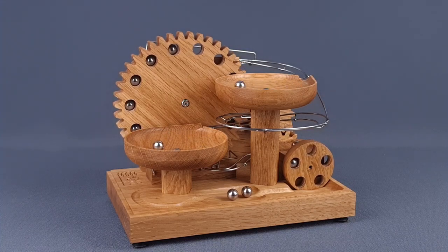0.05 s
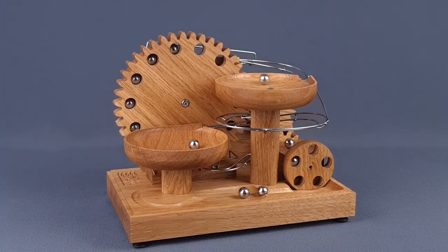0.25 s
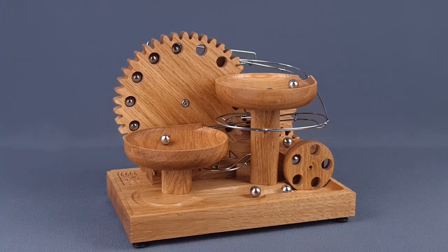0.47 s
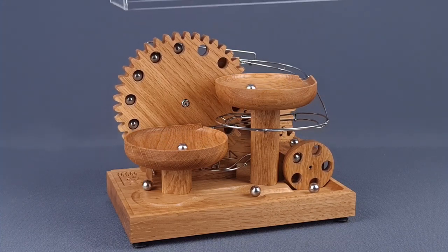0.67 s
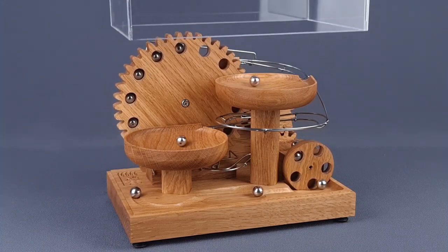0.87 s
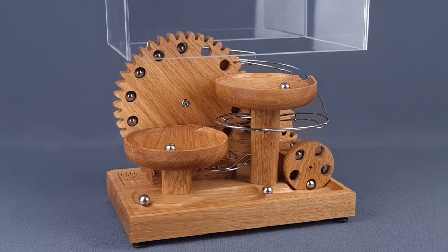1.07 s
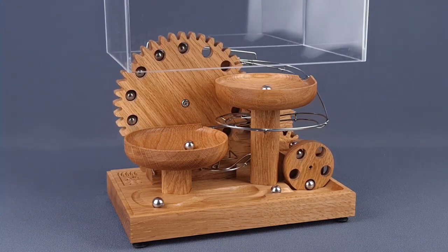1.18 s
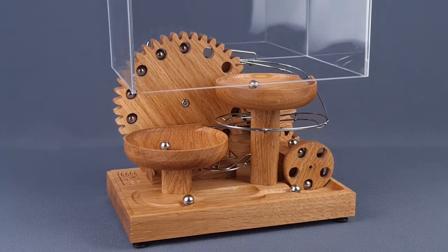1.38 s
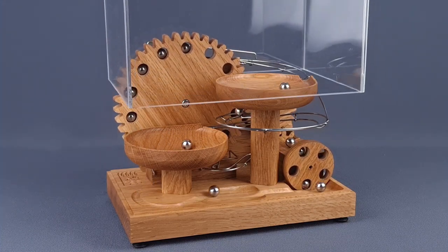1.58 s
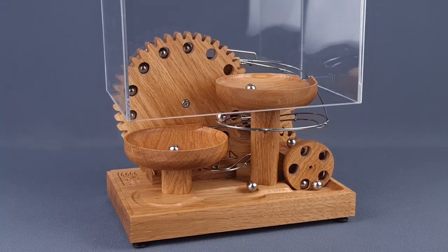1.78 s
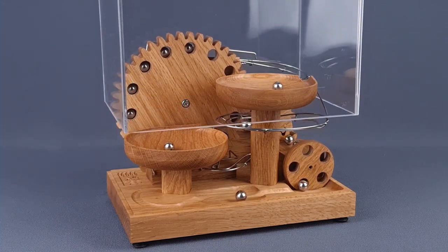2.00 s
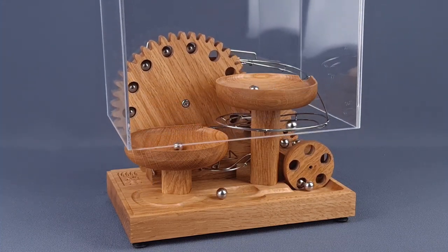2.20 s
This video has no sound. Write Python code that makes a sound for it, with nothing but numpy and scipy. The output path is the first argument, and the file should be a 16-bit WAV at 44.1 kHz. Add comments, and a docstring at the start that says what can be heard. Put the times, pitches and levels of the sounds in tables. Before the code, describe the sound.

Close up in a quiet room, a wooden marble machine clatters: steel balls drop in two quick runs of bounces, with scattered knocks over soft rolling and a faint hum. Then a plastic cover brushes and ticks lightly.

```python
"""Wooden marble machine

Steel balls circle in wooden bowls, drop and bounce, knock against wood and each other, and ring a
wire track over the hum of the drive. Each knock is a click that rings the struck part and spreads
through the frame; rolling is a stream of tiny knocks. A clear plastic cover is lowered over the
small machine with a brushing hiss and a few thin ticks. The room around it is quiet."""
import sys
import numpy as np
from scipy import signal
from scipy.fft import rfft, irfft
from scipy.io import wavfile
from scipy.ndimage import uniform_filter1d

SR = 44100
rng = np.random.default_rng(int(sys.argv[2]) if len(sys.argv) > 2 else 0)


def materialize(psi):
    """Save the field psi as 16-bit PCM at rate SR to the path in sys.argv[1].

    A 1-D psi becomes a single channel; in a 2-D psi each row is a channel.
    """
    bounded = np.clip(np.atleast_2d(psi).T, -1, 1)
    quanta = np.round(bounded * 32767).astype(np.int16)
    wavfile.write(sys.argv[1], SR, quanta)


N = 99225
TIME = np.arange(N) / SR
RIGHT_LAG = 2  # samples


def pocket_bounces():
    """A ball rattles lightly, drops into a wooden pocket and bounces ever faster and softer."""
    # t/s, level/dB, treble limit/Hz, left minus right/dB
    hits = [(.0440, -46, 4100, -5), (.0915, -46.5, 5170, -8), (.1162, -49.5, 5230, -7),
            (.1645, -51.5, 5800, -11), (.2422, -13.5, 10600, -7.5), (.2714, -20.5, 8500, 1),
            (.3113, -24.5, 7000, -4.5), (.3386, -29.5, 6940, 0), (.3578, -35, 6200, -6),
            (.3722, -42.5, 6130, 2)]
    # Pocket resonances: f/Hz, width/Hz, level/dB
    body = [(1450, 420, -15.5), (2010, 730, -11.5), (2605, 310, -6), (4440, 376, 2), (5100, 1500, -2.5),
            (6830, 510, 3.5), (8350, 1980, -12.5), (10600, 580, -12.5), (14000, 3700, -22.5)]
    return blows(hits, body, click_db=-14.5, ring_s=0.01, rise_s=0.00057,
                 frame_s=0.035, frame_db=3, frame_hz=1830, room_db=-7.5)


def ramp_bounces():
    """A ball lands hard on the ramp and settles in quick bounces."""
    # t/s, level/dB, treble limit/Hz, left minus right/dB
    hits = [(1.3103, -44.5, 3980, -7), (1.3276, -19, 9900, -3.5), (1.3825, -21.5, 8750, -2.5),
            (1.4219, -27.5, 7250, -1.5), (1.4514, -37, 6700, -5), (1.4690, -41.5, 7260, 7),
            (1.4884, -37.5, 6600, -3)]
    # Ramp resonances: f/Hz, width/Hz, level/dB
    body = [(1300, 690, -10), (2336, 210, -2.5), (3800, 750, -1.5), (4830, 530, 4.5), (5980, 620, 1.5),
            (7110, 680, 0), (8800, 3900, -9.5), (14500, 3000, -23)]
    return blows(hits, body, click_db=-23, ring_s=0.013, rise_s=0.00048,
                 frame_s=0.042, frame_db=6, frame_hz=2140, room_db=-7.5)


def wood_knocks():
    """Steel meets wood in scattered, duller knocks."""
    # t/s, level/dB, treble limit/Hz, left minus right/dB
    hits = [(.7779, -25, 6860, -2.2), (.9597, -35, 3520, 2.5), (.9796, -31.5, 2440, -1.1),
            (1.0332, -46.5, 3460, 0), (1.0913, -35, 4940, -1), (2.0135, -52.5, 1600, 0.92),
            (2.1839, -47, 3800, 0)]
    # Wood resonances: f/Hz, width/Hz, level/dB
    body = [(1200, 154, -1.5), (2204, 900, -9.5), (3220, 540, 2), (3800, 870, -1.5), (4850, 450, -5.5),
            (6100, 670, -3.5), (10900, 1400, -19.5)]
    return blows(hits, body, click_db=-2, ring_s=0.013, rise_s=0.000445,
                 frame_s=0.045, frame_db=2, frame_hz=2240, room_db=-8)


def ball_clacks():
    """Balls clack sharply against the rim of the tray and against each other."""
    # t/s, level/dB, treble limit/Hz, left minus right/dB
    rim_hits = [(.8468, -27, 10500, -2.5)]
    ball_hits = [(1.7088, -27, 7400, -5), (1.8276, -39, 3680, -1)]
    # Resonances of each contact: f/Hz, width/Hz, level/dB
    rim = [(1470, 330, -18.5), (2320, 500, -15), (2850, 130, -11), (3970, 340, -1), (4600, 340, -13),
           (6280, 600, -14), (8630, 660, -25), (11300, 990, -28)]
    ball = [(1500, 750, -17), (2350, 240, -9.5), (3920, 430, -1), (4450, 260, -9), (6270, 460, -5),
            (10600, 1100, -21)]
    return sum(blows(hits, body, click_db=-1.5, ring_s=0.009, rise_s=0.00085,
                     frame_s=0.064, frame_db=-4.5, frame_hz=2080, room_db=-10)
               for hits, body in ((rim_hits, rim), (ball_hits, ball)))


def heavy_drops():
    """The heaviest drops thud in the base and jolt the wire tracks into a long ring."""
    # t/s, level/dB
    thuds = [(0.2426, -46), (1.329, -56)]
    jolts = [(.2426, -43.5), (1.3280, -53)]
    # Modes of the base and the steel: f/Hz, level/dB, t60/s
    base_modes = [(91, -6.5, 0.43), (178, -6, 0.31)]
    steel_modes = [(2783, 1, .45), (4370, -4.5, .38), (4440, -2.5, .35), (4726, 2, .36), (5083, -5.5, .35),
                   (5750, -2.5, .28), (6685, -6, .26), (6826, -1.5, .26)]
    return ring_modes(thuds, base_modes, rise_s=0.011) + ring_modes(jolts, steel_modes, rise_s=0.004)


def cover_ticks():
    """The plastic cover ticks thinly; its first touch sets the walls ringing."""
    # t/s, level/dB, treble limit/Hz, left minus right/dB
    hits = [(1.5688, -43, 6200, -18), (1.9130, -39, 15100, -8), (1.9417, -35, 16000, -5),
            (1.9868, -49.5, 15300, -10), (2.2020, -48, 15000, -6)]
    # Plastic resonances: f/Hz, width/Hz, level/dB
    body = [(1950, 2500, -14.5), (8860, 2600, -8), (10670, 1100, -0.5), (12800, 1500, -1.5),
            (14800, 2600, -1)]
    # First touch: t/s, level/dB
    touches = [(1.5685, -52.5)]
    # Wall modes: f/Hz, level/dB, t60/s
    wall_modes = [(722, -10, 0.37), (970, -2.5, 0.4), (1400, -12, 0.13), (1904, 2.5, 0.51),
                  (3250, 12, 0.21)]
    ticks = blows(hits, body, click_db=-4, ring_s=0.0058, rise_s=0.00053,
                  frame_s=0.033, frame_db=3.5, frame_hz=5100, room_db=-11)
    return ticks + ring_modes(touches, wall_modes, rise_s=0.01)


def cover_brushing():
    """The cover catches suddenly, slides, and brushes once more; its hollow walls colour the grit."""
    # Slide envelope: t/s, level/dB
    slide = [(1.555, -88), (1.564, -59), (1.570, -33.5), (1.578, -41.5), (1.62, -43.5), (1.66, -48.5),
             (1.72, -52.5), (1.76, -51.5), (1.85, -55.5), (1.89, -63), (1.96, -56), (2.03, -63),
             (2.09, -62.5), (2.14, -44), (2.2, -50), (2.25, -61.5)]
    # Friction spectrum: f/Hz, level/dB
    tone = [(40, -60), (450, -11), (870, -24), (1050, -1.5), (2300, -6.5), (3800, -0.5), (6000, 0.5),
            (8000, -7), (12500, -9), (16000, -19)]
    # Wall resonances: f/Hz, width/Hz, level/dB
    walls = [(717, 26, -10.5), (1140, 130, -5.5), (1540, 65, -3), (2075, 206, 4), (3280, 180, -7)]
    grains = stereo(grit(per_s=9000, spread_db=2.5), same=0.2)
    shell = lambda hz: amp(curve(tone, hz)) + amp(4) * peaks(walls, hz)
    hiss = colour(grains, lambda hz: shell(hz) * fine_modes(hz, spacing_hz=45, depth_db=3.2))
    flutter = amp(1.76 * drift(rate_hz=59))
    return hiss * envelope(slide) * (TIME > slide[0][0]) * flutter * pan(-1.5)


def wire_pings(rise_s=0.00187):
    """Balls chatter on the wire tracks; each length of wire pings at its own pitch."""
    # t/s, level/dB, f/Hz, left minus right/dB
    hits = [(0.0952, -51, 2996, -18), (0.1331, -51.5, 3130, -9), (0.1414, -51, 3000, -20.5),
            (0.4863, -51.5, 3006, -12.5), (0.516, -56, 3045, -3), (.6225, -45, 1957, 2),
            (.6344, -44, 1957, 1.5), (0.655, -47.5, 1924, -5)]
    # Wire modes: pitch ratio, level/dB, t60/s
    modes = [(1, 10, 0.055), (0.52, -6, 0.0387), (1.4, -3, .04)]
    t, pings = np.arange(SR // 4) / SR, np.zeros((2, N))
    for s, db, hz, side_db in hits:
        ping = sum(amp(mode_db - 60 * t / t60) * np.sin(2 * np.pi * (hz * ratio * t + rng.random()))
                   for ratio, mode_db, t60 in modes)
        add(pings, s, amp(db) * ping * np.minimum(t / rise_s, 1) * pan(side_db))
    return pings + amp(-11.5) * room(pings)


def rolling():
    """Balls run over the grain of the wood: dense tiny blows into the bowls."""
    # Roll envelope: t/s, level/dB
    roll = [(0, -54.5), (.04, -49), (.16, -49), (.21, -49.5), (.4, -56), (.5, -57), (.6, -53.5),
            (.68, -51.5), (.88, -55), (1.0, -51.5), (1.15, -55), (1.27, -54), (1.45, -48), (1.55, -60.5),
            (1.85, -53), (1.97, -60), (2.07, -63), (2.25, -57.5)]
    # Bowl resonances: f/Hz, width/Hz, level/dB
    bowls = [(683, 80, -7.5), (1002.7, 31, 4.5), (1246, 190, 7.5), (1476, 190, 3), (1950, 99, 4.5),
             (2130, 1200, 1), (2938, 795, -7), (4300, 760, -9.5), (6900, 1300, -21.5)]
    grains = stereo(grit(per_s=5000, spread_db=3), same=0.61)
    body = colour(grains, lambda hz: peaks(bowls, hz) * fine_modes(hz, spacing_hz=30.06, depth_db=3))
    return body * envelope(roll) * amp(drift(rate_hz=20))


def bowl_singing(width_hz=90):
    """One resonance of a bowl swells as a circling ball sweeps past."""
    # Swells: peak t/s, half length/s, level/dB, f/Hz
    swells = [(.16, 0.061, -54.5, 1420), (1.254, 0.049, -54, 1196)]
    out = np.zeros((2, N))
    for s, half_s, db, pitch in swells:
        tone = colour(noise(same=0.86), lambda hz: peaks([(pitch, width_hz, 0)], hz))
        out += tone * amp(db) * np.exp(-((TIME - s) / half_s) ** 2)
    return out


def base_boom(pitch_hz=117.1, waver_hz=1.5):
    """A ball rolls across the hollow base, which booms on its lowest mode."""
    # Boom envelope: t/s, level/dB
    boom = [(.04, -78), (.108, -61.5), (.2, -51.5), (.226, -60), (.268, -45), (.316, -78), (.344, -55),
            (.45, -61), (.49, -86)]
    return unit(sine(pitch_hz + waver_hz * drift(rate_hz=9))) * envelope(boom)


def drive(waver_hz=7):
    """The drive hums in two wavering, beating tones while its gears murmur in the wooden base."""
    # Envelopes: t/s, level/dB
    hum_level = [(0, -79), (.55, -78), (.7, -64.5), (1.1, -69.5), (1.26, -66.5), (1.42, -57), (1.53, -66.5),
                 (1.95, -67), (2.25, -70.5)]
    murmur_level = [(0, -71.5), (.25, -61), (.5, -70), (1.1, -67), (1.3, -59), (1.55, -68), (2.25, -69)]
    # Hum tones: f/Hz, level/dB
    tones = [(126.3, -11), (113.5, -10.5)]
    # Base resonances: f/Hz, width/Hz, level/dB
    base = [(118, 65, -1), (181.3, 95, 2), (312, 32, 7.5), (426, 90, 5.5), (496, 27, -10.5)]
    hum = unit(sum(amp(db) * sine(hz + waver_hz * drift(rate_hz=5.9)) for hz, db in tones))
    murmur = colour(noise(same=1), lambda hz: peaks(base, hz))
    flutter = amp(3 * drift(rate_hz=10))
    return hum * envelope(hum_level) * flutter + murmur * envelope(murmur_level) * pan(-6)


def room_air():
    """Steady room tone: a faint rumble and a thin hiss."""
    # Air spectrum: f/Hz, level/dB
    tone = [(20, -1), (60, 0.5), (200, -43), (600, -55), (2000, -59.5), (6000, -21.5), (10000, -24),
            (16000, -40)]
    return amp(-73.5) * colour(noise(same=0.78), lambda hz: amp(curve(tone, hz)))


def room(x, rise_s=0.0022):
    """A diffuse tail, each band dying at its own speed."""
    # Room decay: f/Hz, t60/s
    decay = [(200, 0.23), (1500, 0.65), (4000, 0.35), (7000, 0.27), (12000, 0.16)]
    hz, t, bands = signal.stft(rng.standard_normal((2, SR * 3 // 4)), SR, nperseg=256)
    tail = signal.istft(bands * amp(-60 * t / curve(decay, hz)[:, None]), SR, nperseg=256)[1]
    tail *= np.minimum(np.arange(tail.shape[1]) / SR / rise_s, 1)
    return signal.fftconvolve(x, unit_energy(tail), axes=1)[:, :N]


def blows(hits, body, click_db, ring_s, rise_s, frame_s, frame_db, frame_hz, room_db):
    """Each contact clicks, rings the struck part and spreads through the frame, never twice alike."""
    # Mids radiate to the left, treble to the right: f/Hz, left minus right/dB
    lean = [(1300, 3.5), (2400, 2), (4400, -2), (8000, -1)]
    size, vary = 4096, 0.52  # samples per blow; share of the echoes that changes from spot to spot
    hz = np.fft.rfftfreq(size, 1 / SR)
    frame_lowpass = signal.butter(1, frame_hz, fs=SR)
    low_cut = 1 / np.sqrt(1 + (976 / np.maximum(hz, 550)) ** 10)  # small parts radiate little bass
    # The room hears all faces of the part, so resonances blur; its walls swallow the treble.
    broad = [(f, width * 2.3, db) for f, width, db in body]
    room_tone = peaks(broad, hz) / np.sqrt(1 + (hz / 10500) ** 4)

    def echoes():
        in_part = stereo(scatter(ring_s, rise_s), same=0.28)
        in_frame = signal.lfilter(*frame_lowpass, stereo(scatter(frame_s), same=0.99))
        return in_part + amp(frame_db) * in_frame

    shared = echoes()
    near, far = np.zeros((2, 2, N))
    for s, db, limit_hz, side_db in hits:
        strike = np.sqrt(1 - vary) * shared + np.sqrt(vary) * echoes()
        strike[[0, 1], [0, RIGHT_LAG]] += amp(click_db)
        contact = low_cut / np.sqrt(1 + (hz / limit_hz) ** 7) * flatten(strike)
        gain = np.sqrt(0.002 * SR) * amp(db) * pan(side_db)  # level as if packed into 2 ms
        for bus, tone in ((near, peaks(body, hz)), (far, room_tone)):
            ring = np.array([ringing(tone * contact * amp(side * curve(lean, hz) / 2))
                             for side in (1, -1)])
            knock = signal.fftconvolve(strike, ring[:, :size // 2], axes=1)
            add(bus, s, unit_energy(knock) * gain)
    return near + amp(room_db) * room(far)


def ring_modes(hits, modes, rise_s):
    """Soft blows set a large body ringing in its modes."""
    t, out = np.arange(SR // 2) / SR, np.zeros((2, N))
    ring = sum(amp(db - 60 * t / t60) * np.sin(2 * np.pi * hz * t) for hz, db, t60 in modes)
    for s, db in hits:
        add(out, s, amp(db) * ring * np.minimum(t / rise_s, 1) * pan(0))
    return out


def scatter(t60, rise_s=0.00033, size=4096):
    """Three bursts of dense, uncoloured echoes that build up and die."""
    t = np.arange(size) / SR
    fade = amp(-60 * t / t60) * np.minimum((t + 1 / SR) / rise_s, 1)
    bursts = rng.standard_normal((3, size)) * fade
    for _ in range(8):  # whiten, then restore the fade
        spectrum = rfft(bursts)
        bursts = irfft(spectrum / (abs(spectrum) + 1e-12))
        bursts *= fade / np.sqrt(abs(uniform_filter1d(bursts ** 2, size=48)) + 1e-14)
    return unit_energy(bursts)


def ringing(gain):
    """Minimum-phase impulse response of a gain curve."""
    log_gain = np.log(np.maximum(np.r_[gain, gain[-2:0:-1]], 1e-5))
    spectrum = np.exp(np.conj(signal.hilbert(log_gain)))
    return unit_energy(np.fft.ifft(spectrum).real)


def flatten(x):
    """Gain curve that levels narrow spectral humps and keeps the overall slope."""
    power = (abs(rfft(x)) ** 2).sum(0)
    return np.sqrt(uniform_filter1d(power, size=221) / uniform_filter1d(power, size=21))


def grit(per_s, spread_db):
    """Three trains of tiny contacts of uneven size."""
    grains = rng.standard_normal((3, N)) * (rng.random((3, N)) < per_s / SR)
    return grains * amp(spread_db * np.minimum(rng.exponential(1, (3, N)), 4))


def fine_modes(hz, spacing_hz, depth_db):
    """Gain ripple from the many small modes of a body."""
    grid = np.arange(4000) * spacing_hz
    return amp(depth_db * np.interp(hz, grid, rng.standard_normal(len(grid))))


def peaks(table, hz):
    """Gain of a set of resonances."""
    return np.sqrt(sum((amp(db) / (1 + (2 * (hz - f) / width) ** 2)) ** 2 for f, width, db in table))


def colour(x, gain):
    """Filters by a function of frequency, to rms 1."""
    return unit(irfft(rfft(x) * gain(np.fft.rfftfreq(N, 1 / SR)), N))


def drift(rate_hz):
    """Smooth random motion, rms 1."""
    return colour(rng.standard_normal(N), lambda hz: np.exp(-(hz / rate_hz) ** 2))


def sine(hz):
    """A tone that follows a pitch curve."""
    return np.sin(2 * np.pi * np.cumsum(hz) / SR)


def noise(same):
    """Stereo white noise."""
    return stereo(rng.standard_normal((3, N)), same)


def stereo(trio, same):
    """Two partly alike channels from three signals; the right hears the shared one later."""
    late = np.pad(trio[0], (RIGHT_LAG, 0))[:trio.shape[1]]
    return np.sqrt(same) * np.array([trio[0], late]) + np.sqrt(1 - same) * trio[1:]


def pan(db):
    """Constant-power gains from left minus right in dB."""
    return amp([[db / 2], [-db / 2]]) / np.sqrt((amp(db) + amp(-db)) / 2)


def add(mix, s, sound):
    """Mixes a stereo sound in at s seconds."""
    part = mix[:, max(round(s * SR), 0):][:, :sound.shape[1]]
    part += sound[:, :part.shape[1]]


def curve(points, hz):
    """Interpolates on a log-frequency axis."""
    f, value = np.transpose(points)
    return np.interp(np.log(hz + 1), np.log(f + 1), value)


def envelope(points):
    """Gain over time from points of t/s, level/dB."""
    return amp(np.interp(TIME, *np.transpose(points)))


def amp(db):
    """Decibels to gain."""
    return 10 ** (np.asarray(db) / 20)


def unit(x):
    """Scales to rms 1."""
    return x / np.sqrt(np.mean(x ** 2) + 1e-20)


def unit_energy(x):
    """Scales each channel to energy 1."""
    return x / np.linalg.norm(x, axis=-1, keepdims=True)


def scene():
    """Knocks and pings in front; rolling, the drive, the sliding cover and room tone behind."""
    knocks = pocket_bounces() + ramp_bounces() + wood_knocks() + ball_clacks() + heavy_drops()
    details = cover_ticks() + wire_pings()
    bed = room_air() + bowl_singing() + rolling() + base_boom() + drive()
    return knocks + details + bed + cover_brushing()


def record(dry):
    """A steep low-pass trims the top of the treble."""
    lowpass = signal.firwin(511, 16200, window=("kaiser", 9), fs=SR)
    return signal.oaconvolve(dry, lowpass[None], "same")


dry = scene()
out = record(dry)
materialize(out)
```